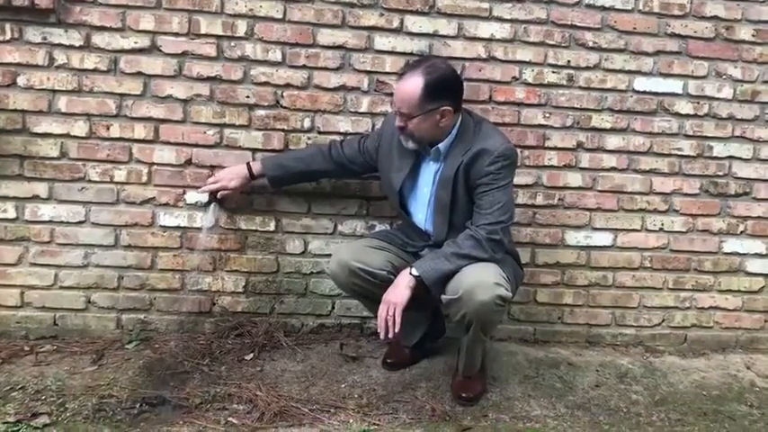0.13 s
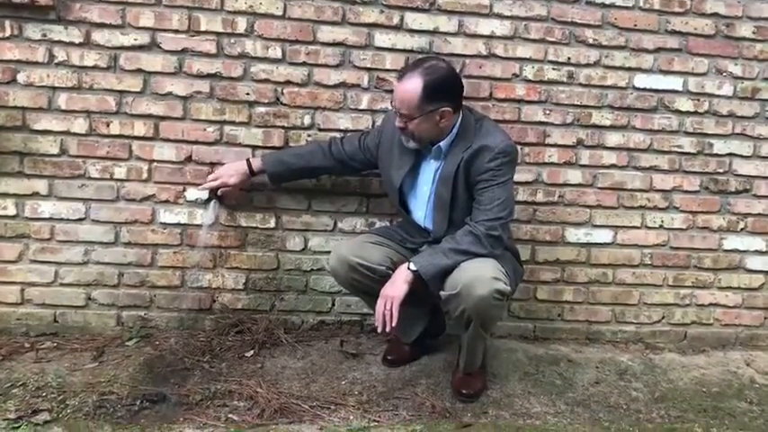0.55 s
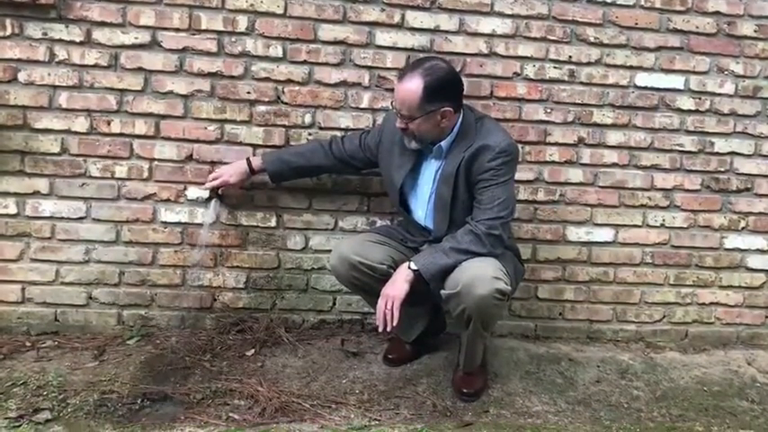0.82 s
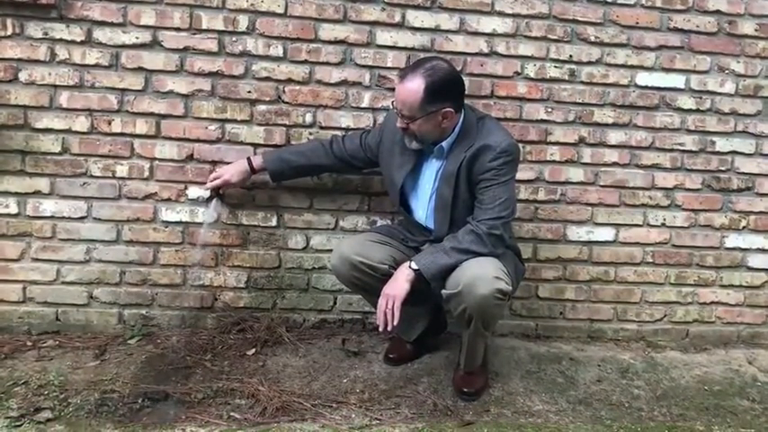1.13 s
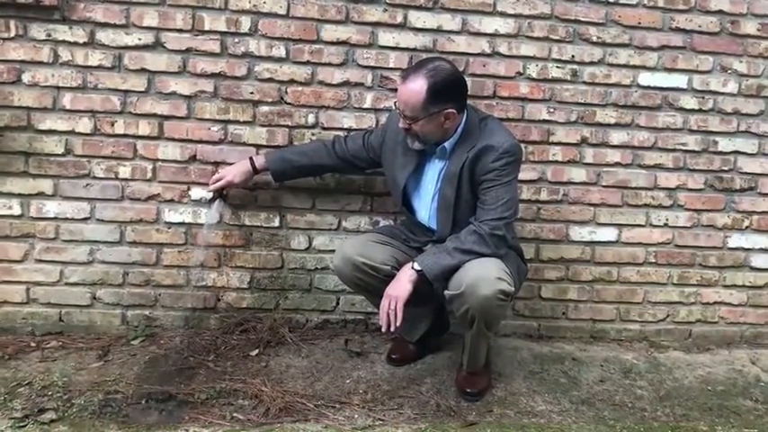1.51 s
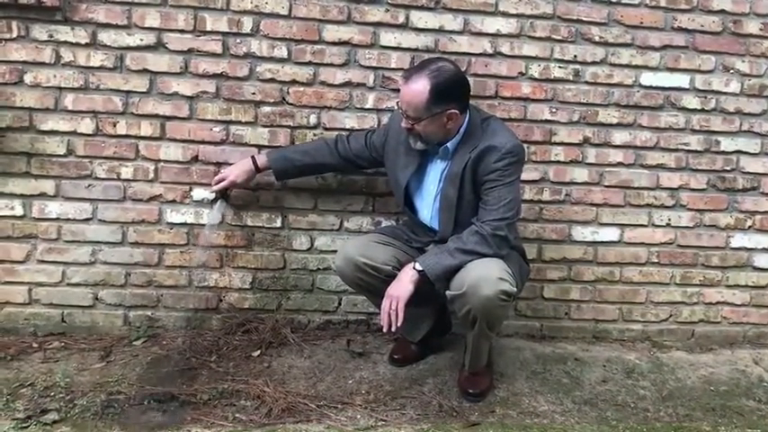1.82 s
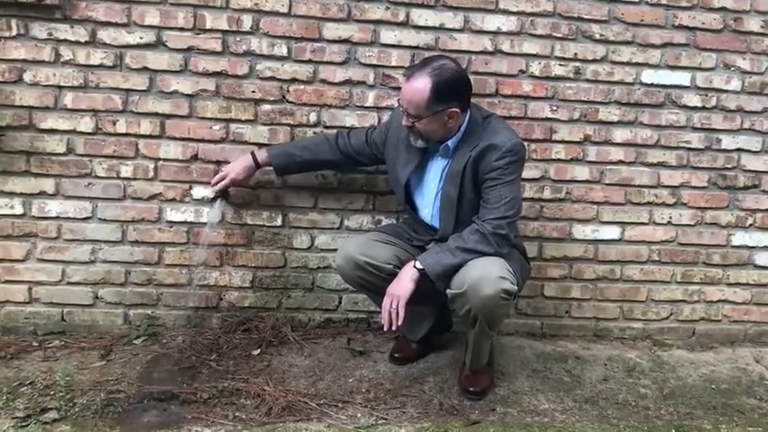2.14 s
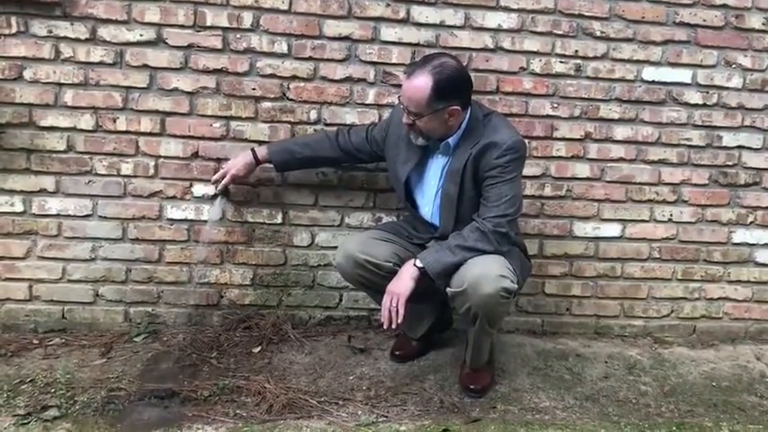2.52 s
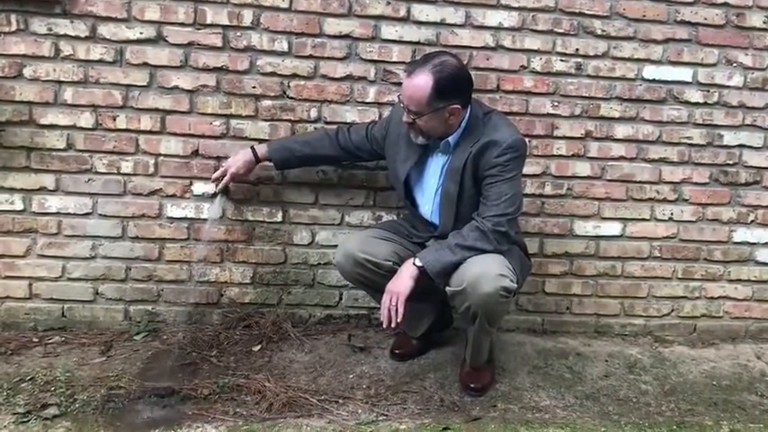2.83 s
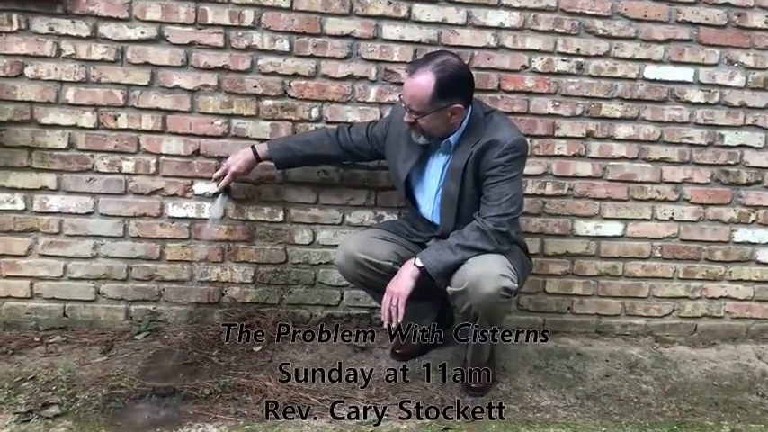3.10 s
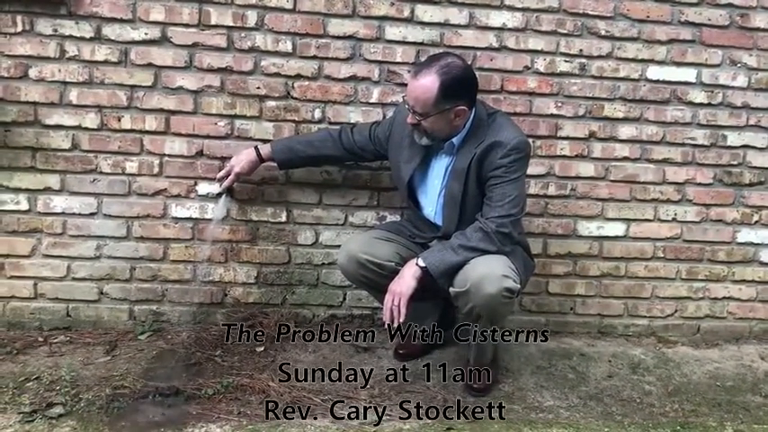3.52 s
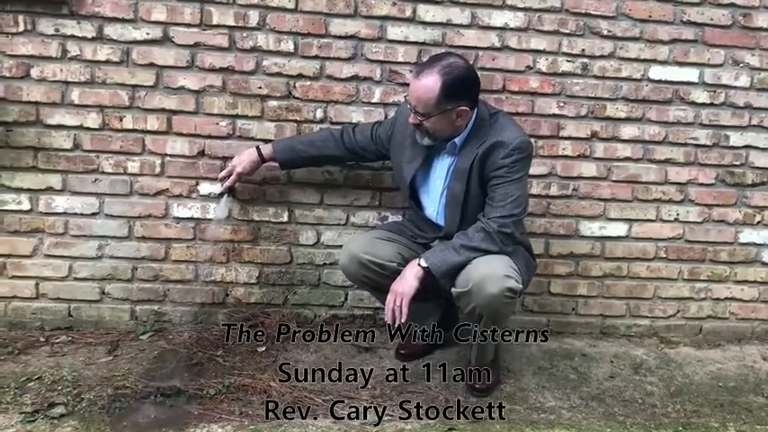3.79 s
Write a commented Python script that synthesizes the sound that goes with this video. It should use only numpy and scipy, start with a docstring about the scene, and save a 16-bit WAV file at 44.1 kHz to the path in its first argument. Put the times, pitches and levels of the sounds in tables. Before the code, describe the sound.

An outdoor tap sprays water with a crackling hiss while a distant fan hums low.

```python
"""Water hisses and crackles from a part-open outdoor tap, low on a brick wall, close to one microphone.
It rings in the pipe and spout, spits now and then, and sprays the ground, where fat drops smack and
bubbles plink in a puddle. The flow sags a few times and once almost chokes. Farther off a motor-driven
fan hums low over the rumble of the yard, with a murmur and faint tones, perhaps from the plumbing."""
import sys
import numpy as np
from scipy import signal
from scipy.fft import rfft, irfft, next_fast_len
from scipy.io import wavfile
from scipy.ndimage import uniform_filter1d, map_coordinates

SR = 44100
rng = np.random.default_rng(int(sys.argv[2]) if len(sys.argv) > 2 else 0)


def dump(signal):
    """Clip the signal to [-1, 1] and save it as 16-bit WAV at the path in sys.argv[1]."""
    limited = np.clip(np.atleast_2d(signal).T, -1, 1)
    pcm = np.round(limited * 32767).astype(np.int16)
    wavfile.write(sys.argv[1], SR, pcm)


N = 174195
TIME_S = np.arange(N) / SR


def amp(db):
    """Decibels to gain."""
    return 10 ** (np.asarray(db) / 20)


def unit(x):
    """Scale to rms 1."""
    return x / np.sqrt(np.mean(x ** 2) + 1e-20)


def wobble(rate_hz):
    """A smooth random curve, rate_hz knots a second."""
    return map_coordinates(rng.standard_normal(4096), [TIME_S * rate_hz], mode="mirror")


def spells(rows):
    """Sum of flat-topped level changes in dB."""
    return sum(db / (1 + np.abs(2 * (TIME_S - middle) / length) ** 6) for middle, length, db in rows)


def colour(points):
    """Gain against frequency from (Hz, dB) points."""
    f, db = np.transpose(points)
    return lambda hz: amp(np.interp(np.log(hz + 1), np.log(f + 1), db))


def filtered(x, gain):
    """Causal, minimum-phase filter with the given gain against frequency."""
    size = 2 * next_fast_len(N // 2 + 8192)
    gains = np.maximum(gain(np.fft.rfftfreq(size, 1 / SR)), 1e-6)
    cepstrum = irfft(np.log(gains), size)
    cepstrum[1:size // 2] *= 2
    cepstrum[size // 2 + 1:] = 0
    return irfft(rfft(x, size) * np.exp(rfft(cepstrum)), size)[:N]


def noise(points):
    """Steady noise of the given colour, rms 1."""
    return unit(filtered(rng.standard_normal(N), colour(points)))


def crackle(rate_hz, spread_db, share):
    """Tiny pops of very uneven size over a smooth rush; share is their part of the power."""
    hits = rng.random(N) < rate_hz / SR
    sizes = amp(spread_db * np.clip(rng.standard_normal(N), -3, 2))
    pops = hits * sizes * rng.choice([-1, 1], N)
    return np.sqrt(share) * unit(pops) + np.sqrt(1 - share) * rng.standard_normal(N)


def churn(x, depth_db):
    """Let the colour of a sound shift at random from moment to moment."""
    spectra = signal.stft(x, nperseg=256)[2]
    patches = uniform_filter1d(rng.standard_normal(spectra.shape), size=8, axis=0)
    patches = unit(uniform_filter1d(patches, size=7, axis=1))
    return unit(signal.istft(spectra * amp(depth_db * patches), nperseg=256)[1][:N])


def bursts(rate_hz, decay_s):
    """Sudden jumps that die away; mean 0, rms 1."""
    kicks = (rng.random(N) < rate_hz / SR) * rng.random(N)
    jumps = signal.lfilter([1], [1, -np.exp(-1 / (decay_s * SR))], kicks)
    return unit(jumps - jumps.mean())


def ringing(x, modes, shift_s=1.36, fade_s=0.05):
    """Ring steep-sided resonances whose voice turns hollower around shift_s."""
    def voice(shift):
        return lambda hz: np.sqrt(sum(
            amp(db + shift * shift_db) ** 2 / (1 + ((hz - pitch) / half_width) ** 2) ** 2
            for pitch, half_width, db, shift_db in modes))
    late = 0.5 + 0.5 * np.tanh((TIME_S - shift_s) / fade_s)
    return unit((1 - late) * filtered(x, voice(0)) + late * filtered(x, voice(0.94)))


# Resonances of pipe and spout: pitch_hz, half_width_hz, level_db, shift_db (0.94 of it applies once the voice
# turns hollower)
PIPE_MODES = [(2060, 182, -13.5, 2.5), (2227, 104, -9, 1), (2528, 111, -4.5, 0), (2840, 45, -8, 0),
              (3127, 130, -2.5, 0.5), (3210, 50, -2, 4), (3417, 84, -4.5, 4), (3930, 128, -7.5, 3),
              (4280, 170, -18.5, 6.5), (4607, 135, -9.5, 3)]
SPOUT_MODES = [(4915, 140, -6.5, 1), (5340, 180, -2.5, 2), (5590, 270, -3, 0), (6287, 214, 2, -1.5),
               (6760, 260, -4.5, -3), (7350, 350, -4, -1), (7630, 270, -3, -4), (8500, 330, -8.5, -3),
               (10100, 800, -8.5, -7)]
# Fizz of the spray at the tap's mouth: frequency_hz, gain_db
SPRAY_COLOUR = [(1500, -26.5), (3000, -8), (6000, -1.5), (8200, -0.5), (10200, 4), (12000, 2), (14000, 3),
                (15800, 0)]
# Gushes that ring the pipe harder: middle_s, length_s, change_db
PIPE_GUSHES = [(1.51, 0.074, 4), (1.72, 0.081, 2), (2.025, 0.065, 5), (2.49, 0.036, 2.5), (2.84, 0.081, 1),
               (3.03, 0.061, 1.5), (3.44, 0.24, 2.5)]


def jet(flow_db):
    """Close up, bubbles collapse in the valve and ring pipe and spout; the spray fizzes above."""
    burst_db = 1.56 * bursts(rate_hz=110, decay_s=0.0024)
    pipe = churn(ringing(crackle(1800, spread_db=3, share=0.57), PIPE_MODES), depth_db=1.22)
    spout = churn(ringing(crackle(2000, spread_db=4.5, share=0.3), SPOUT_MODES), depth_db=1.25)
    spray = churn(filtered(crackle(2200, spread_db=5, share=0.31), colour(SPRAY_COLOUR)), depth_db=1.5)
    gush_db = spells(PIPE_GUSHES)
    rings = amp(-25 + gush_db) * pipe + amp(-22.5 + 0.21 * gush_db) * spout
    return amp(flow_db) * (amp(0.3 * burst_db) * rings + amp(-21.5 + burst_db) * spray)


def bubbles(count, pitch_hz, log_spread, decay_cycles, spread_db):
    """Small bubbles ring in the puddle, each rising in pitch as it fades."""
    starts = (rng.random((count, 1)) * N).astype(int)
    detune, size = rng.standard_normal((2, count, 1))
    samples = np.arange(SR // 40)
    cycles = pitch_hz * np.exp(log_spread * detune) * samples / SR
    age = cycles / decay_cycles
    envelope = amp(spread_db * np.clip(size, -2, 2)) * np.exp(-2 * age) * (1 - np.exp(-10 * age))
    rings = envelope * np.sin(2 * np.pi * cycles * (1 + 0.025 * age))
    return unit(np.bincount((starts + samples).ravel(), rings.ravel(), N)[:N])


# Patter on the ground below the tap: frequency_hz, gain_db
PATTER_COLOUR = [(150, -18.5), (300, -1.5), (600, -2.5), (1000, -1.5), (1500, -1), (1900, 2.5), (2600, -3),
                 (6000, -37.5)]


def splash(flow_db):
    """The spray patters on wet earth and concrete and stirs up bubbles."""
    drops = crackle(600, spread_db=3.5, share=0.45)
    patter = churn(filtered(drops, colour(PATTER_COLOUR)), depth_db=1.5)
    puddle = bubbles(count=600, pitch_hz=1349, log_spread=0.251, decay_cycles=9.6, spread_db=2.5)
    return amp(1.15 * flow_db) * (amp(-38) * patter + amp(-47) * puddle)


# Hum of the fan and its motor, before the swell: pitch_hz, level_db
FAN_LINES = [(40.9, -48), (61.32, -38), (81.8, -33), (94.21, -28), (102.2, -39)]
# Slow swell of that hum: time_s, change_db
FAN_SWELL = [(0, -3.5), (.7, 0), (1.2, 0.5), (2.1, 1.5), (2.9, -0.5), (3.5, -3), (3.95, -3)]
# Rumble of the yard all around: frequency_hz, gain_db
YARD_COLOUR = [(20, -34), (40, -25), (65, -1.5), (90, 1.5), (125, -0.5), (200, -10.5), (300, -16),
               (600, -20.5), (3000, -48)]


def fan():
    """In the background, low lines of a fan and its motor beat together over the yard's rumble."""
    hum = np.zeros(N)
    for hz, db in FAN_LINES:
        peak = np.sqrt(2) * amp(db + 0.8 * wobble(3.16))
        hum += peak * np.sin(2 * np.pi * (hz * TIME_S + rng.random()) + 0.23 * wobble(3.23))
    swell_db = np.interp(TIME_S, *np.transpose(FAN_SWELL))
    return amp(swell_db) * hum + amp(-36) * noise(YARD_COLOUR)


# Faint tones behind the water: pitch_hz, level_db, loudest_s, half_length_s
FAINT_TONES = [(288, -55, 0.79, 3.4), (306, -44.5, 0.53, 0.69), (376, -43, 0.82, 0.31),
               (378, -56.5, 1.8, 1.5), (526, -53.5, 2, 1.2), (652, -49, 2.1, .45), (652, -50, 3.38, .35),
               (709, -58, 2, 1.7)]
# Low murmur beneath them: frequency_hz, gain_db
MURMUR_COLOUR = [(90, -27), (190, 1.5), (310, 0), (420, -3), (650, -5), (800, -6), (1400, -38)]


def plumbing(flow_db):
    """Faint unsteady tones and a low murmur swell and fade, dipping with the flow."""
    def swell(loudest_s, half_length_s):
        return np.exp(-0.5 * ((TIME_S - loudest_s) / half_length_s) ** 2)
    tones = np.zeros(N)
    for hz, db, loudest_s, half_length_s in FAINT_TONES:
        peak = np.sqrt(2) * amp(db + 2 * wobble(7.74)) * swell(loudest_s, half_length_s)
        tones += peak * np.sin(2 * np.pi * hz * TIME_S + 0.5 * wobble(10))
    murmur = amp(-41.5) * swell(0.68, 0.53) * noise(MURMUR_COLOUR)
    return amp(0.5 * flow_db) * (tones + murmur)


# Sharp spits at the spout: start_s, relative_level_db, pitch_hz
JET_SPITS = [(0.2239, -6, 10000), (0.3814, -5, 9770), (0.5352, -5, 11400), (0.6779, -6, 10100),
             (0.7891, -5, 13900), (0.9804, -6, 9890), (1.1817, -6, 12700), (1.3234, -6, 15000),
             (1.6412, -6, 9360), (1.8996, -5, 11600), (1.9505, -5, 9790), (2.2428, -5, 11800),
             (2.3166, -6, 12000), (2.5421, -5, 11800), (2.605, -3, 10500), (2.7292, -3, 9630),
             (3.1218, -6, 12500), (3.1717, -5, 10500), (3.2994, -4, 14800), (3.4436, -4, 9350),
             (3.6142, -5, 14900), (3.7065, -7, 10200), (3.8965, -7, 12400)]


def spits(rise_s=0.00014, gain_db=0.5):
    """Single drops burst with a very short, high snap."""
    out, t = np.zeros(N + SR), np.arange(SR // 100) / SR
    for start_s, db, hz in JET_SPITS:
        hiss = 0.17 * np.diff(rng.standard_normal(len(t) + 1))
        snap = (np.sin(2 * np.pi * hz * t) + hiss) * t * np.exp(-t / rise_s)
        out[round(start_s * SR):][:len(t)] += amp(db + gain_db) * snap / np.abs(snap).max()
    return out[:N]


# Fat drops hitting the ground nearby: start_s, level_db
FAT_DROPS = [(0.319, -19.5), (0.416, -16), (1.529, -17), (1.762, -15), (1.988, -17), (2.729, -21),
             (2.82, -19), (2.853, -15), (2.969, -22), (3.013, -14.5), (3.217, -16.5), (3.473, -17)]
# Colour of their impact: frequency_hz, gain_db
SMACK_COLOUR = [(400, -32), (1400, -19), (2200, 1), (3200, -4), (5300, 0), (7500, -19.5), (14000, -8.5)]


def smacks(rise_s=0.0024):
    """Each fat drop lands as a burst of noise a few milliseconds long."""
    envelope = np.zeros(N)
    for start_s, db in FAT_DROPS:
        age = np.maximum(TIME_S - start_s, 0) / rise_s
        envelope += amp(db) * age * np.exp(1 - age)
    return envelope * noise(SMACK_COLOUR)


# Larger bubbles in the puddle under the tap: start_s, pitch_hz, level_db
LARGE_BUBBLES = [(2.122, 1216, -28), (3.283, 1340, -29)]


def plinks(decay_s=0.011, glide_per_s=2.9):
    """Each bubble starts softly and rises in pitch as it fades."""
    out = np.zeros(N)
    for start_s, hz, db in LARGE_BUBBLES:
        t = np.maximum(TIME_S - start_s, 0)
        envelope = amp(db) * np.exp(-t / decay_s) * (1 - np.exp(-10 * t / decay_s))
        out += envelope * np.sin(2 * np.pi * hz * t * (1 + glide_per_s * t / 2))
    return out


# Sags in the flow through the tap: middle_s, length_s, change_db
FLOW_SAGS = [(.062, 0.068, -4), (.2, 0.077, -2), (1.185, 0.052, -3), (1.895, 0.061, -3.5),
             (2.586, 0.11, -8.5), (3.15, 0.082, -2), (3.615, 0.044, -4), (3.735, .13, -5),
             (3.95, 0.18, -1.5)]


def scene():
    """Tap, puddle and background at one microphone; jet, splash and plumbing share one flow."""
    flow_db = spells(FLOW_SAGS) + 0.45 * wobble(35.03)  # sags plus a quick sputter
    water = jet(flow_db) + spits() + splash(flow_db) + smacks() + plinks()
    return (water + plumbing(flow_db) + fan())[None]


def record(dry):
    """The camera keeps nothing above its band limit."""
    top_hz = 15740
    size = next_fast_len(N + SR // 2)
    passband = np.fft.rfftfreq(size, 1 / SR) < top_hz
    return irfft(rfft(dry, size) * passband, size)[:, :N]


dry = scene()
out = record(dry)
dump(out)
```